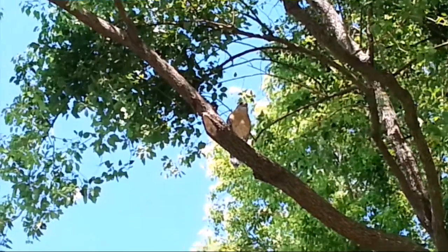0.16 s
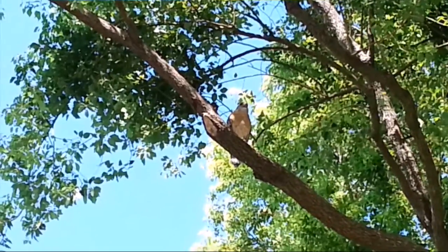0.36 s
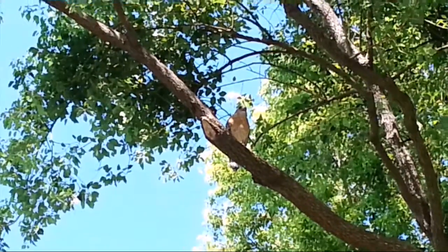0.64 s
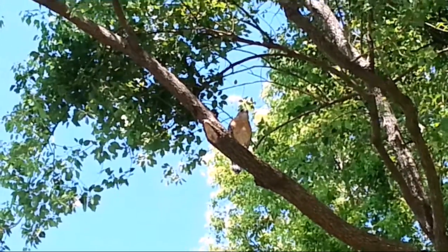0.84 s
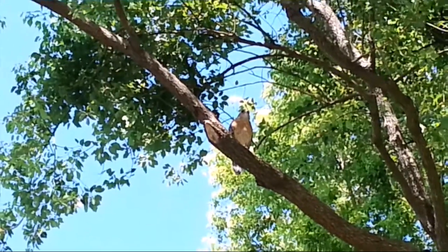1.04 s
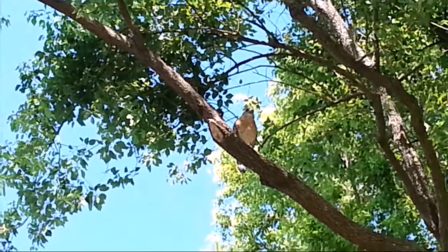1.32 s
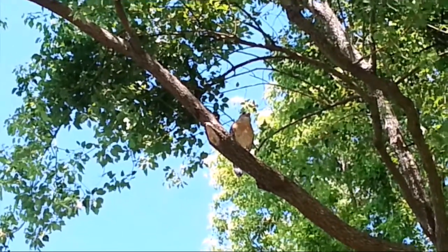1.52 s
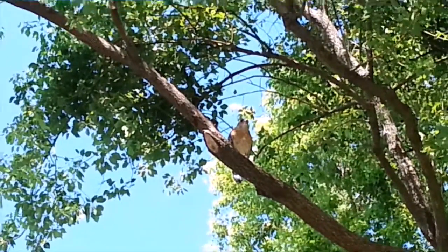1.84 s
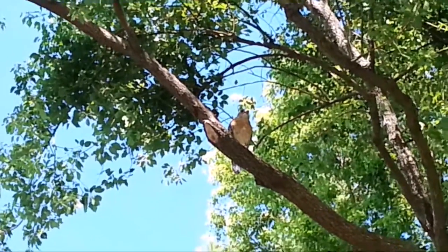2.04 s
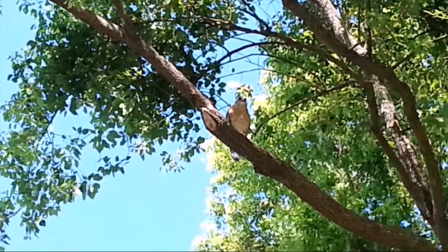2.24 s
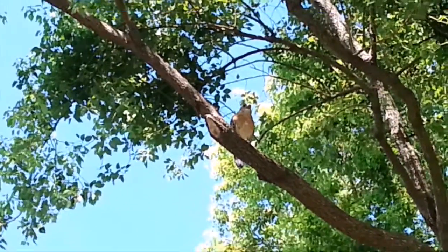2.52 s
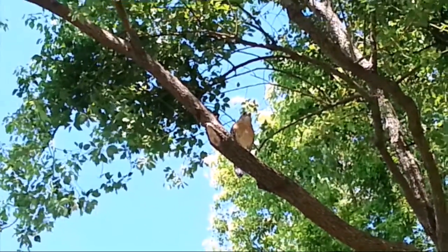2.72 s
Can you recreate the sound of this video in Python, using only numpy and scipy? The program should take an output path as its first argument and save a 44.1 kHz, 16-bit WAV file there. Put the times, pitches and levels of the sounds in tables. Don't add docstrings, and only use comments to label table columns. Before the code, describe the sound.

Three piercing, falling hawk screams echo among trees over gusty low microphone rumble and faint hiss.

```python
import sys
import numpy as np
from scipy import signal
from scipy.fft import rfft, irfft
from scipy.io import wavfile
from scipy.ndimage import uniform_filter1d, minimum_filter1d

SR = 44100
rng = np.random.default_rng(int(sys.argv[2]) if len(sys.argv) > 2 else 0)


def gain_from_db(level_db):
    decades = np.asarray(level_db, float) / 20
    return 10 ** decades


def digitize_waveform(pressure):
    field = np.atleast_2d(pressure).T
    bounded = np.clip(field, -1, 1)
    quanta = np.round(bounded * 32767).astype(np.int16)
    wavfile.write(sys.argv[1], SR, quanta)


N = 127890


def rms_one(x):
    return x / np.sqrt(np.mean(x ** 2, axis=-1, keepdims=True) + 1e-20)


def drift(rate_hz, count=1):
    r = np.exp(-2 * np.pi * rate_hz / SR)
    white = rng.standard_normal((count, N + SR))
    return rms_one(signal.lfilter([1], [1, -2 * r, r * r], white)[:, SR:])


def coloured(spectrum):
    hz, db = np.transpose(spectrum)
    grid_hz = np.arange(N // 2 + 1) * SR / N + 1
    shape_db = np.interp(np.log(grid_hz), np.log(hz), db, left=-80, right=-80)
    return rms_one(irfft(rfft(rng.standard_normal((2, N))) * gain_from_db(shape_db), N))


def resonance(x, hz, width_hz):
    r = np.exp(-np.pi * width_hz / SR)
    return signal.lfilter(np.array([1, 0, -1]) * (1 - r * r) / 2, [1, -2 * r * np.cos(2 * np.pi * hz / SR), r * r], x)


def bells(x, rows):
    for hz, width_hz, db in rows:
        a, w = gain_from_db(db / 2), 2 * np.pi * hz / SR
        s = np.sin(w) * max(width_hz, 45) / hz / 2
        x = signal.lfilter([1 + s * a, -2 * np.cos(w), 1 - s * a], [1 + s / a, -2 * np.cos(w), 1 - s / a], x + 1e-18)
    return x


# pitch_hz, level_db (per Hz)
FLOOR = [(150, -29), (250, -7.5), (2550, -18), (2810, -20), (3690, -25), (4610, -29), (5870, -29.5),
         (8900, -27), (10100, -34), (11000, -82), (22000, -120)]
# pitch_hz, width_hz, lift_db
FLOOR_VALLEY = [(1543, 314, -8), (6950, 870, -9)]
# pitch_hz, width_hz, level_db, throbs_per_s
INSECTS = [(4705, 480, -57.5, 200), (9250, 960, -60.5, 150), (2930, 180, -66.5, 100), (533, 50, -53.5, 15)]


def floor():
    mid, side = bells(coloured(FLOOR), FLOOR_VALLEY)
    alike = 0.25
    both = np.sqrt(1 + alike) * mid + np.sqrt(1 - alike) * side * [[1], [-1]]
    out = gain_from_db(-45 + 1.2 * drift(3)) * both
    for hz, width_hz, db, rate_hz in INSECTS:
        white = rng.standard_normal((2, N))
        mid, side = rms_one(resonance(resonance(white, hz, width_hz), hz, width_hz))
        throb_db = drift(rate_hz) + 0.39 * drift(4.9)
        out = out + gain_from_db(db + throb_db) * (mid + 0.57 * side * [[1], [-1]])
    return out


# pitch_hz, level_db (per Hz)
WIND = [(15, -74), (25, -32), (70, 3.5), (211, 1.5), (287, -4.5), (395, -11), (461, -16), (700, -15),
        (910, -84), (1540, -120)]
# time_s, level_db, left_minus_right_db
GUST = [(0.0, -52, -5.5), (0.3, -46, 4), (0.81, -51.5, -11.5), (1.11, -43, 8.5), (1.54, -46, -3),
        (1.7, -44.5, 15), (1.77, -47, -4), (2.08, -42, 11), (2.329, -41.5, -5.5), (2.431, -42, 23.5),
        (2.45, -45, 0), (2.83, -52.5, 7), (2.9, -45, -6.5)]


def wind():
    s, db, pan_db = np.transpose(GUST)
    t, sides = np.arange(N) / SR, np.array([[.5], [-.5]])
    gust_db = np.interp(t, s, db) + sides * np.interp(t, s, pan_db) + 4.5
    lumps_db = 6 * drift(20, count=2)
    return gain_from_db(gust_db + lumps_db) * coloured(WIND)


# middle_s, peak_db, pitch_hz
LEFT_BUFFETS = [(0.283, -20.5, 161), (0.33, -15, 212), (0.352, -12, 224), (0.44, -11, 280),
                (0.965, -25, 146.4), (0.989, -16, 195), (1.035, -17, 240), (1.052, -20, 160),
                (1.091, -17, 175), (1.138, -14.5, 200), (1.325, -15.5, 221), (1.38, -21.5, 212),
                (1.425, -19.5, 197), (1.595, -22, 214), (1.614, -18.5, 211), (1.646, -19.5, 210),
                (1.672, -19.5, 200), (1.704, -21.5, 193), (1.924, -18, 180), (2.059, -15, 202),
                (2.085, -14, 194), (2.136, -18, 193), (2.216, -18.5, 202), (2.25, -21.5, 210),
                (2.38, -13.5, 179), (2.42, -9.5, 175), (2.626, -22, 157)]
RIGHT_BUFFETS = [(0.304, -25, 139), (0.369, -15, 135), (0.394, -25, 117), (0.416, -25.5, 86),
                 (0.924, -23.5, 161), (0.975, -11, 198), (0.999, -8, 257), (1.026, -17, 185),
                 (1.057, -25, 122), (1.073, -28, 154), (1.097, -31, 173), (1.124, -24, 178),
                 (1.295, -20.5, 169), (1.317, -16, 211), (1.339, -12.5, 262), (1.411, -23, 133),
                 (1.429, -18, 204), (1.553, -24, 118), (1.576, -22, 130), (1.614, -33, 144.2),
                 (1.94, -25.5, 195), (2.092, -26, 141), (2.132, -25, 136), (2.282, -31, 164),
                 (2.34, -33, 189), (2.36, -24.5, 171), (2.897, -21, 124)]


def buffets():
    out, reach = np.zeros((2, N)), SR // 20
    for port, rows in enumerate([LEFT_BUFFETS, RIGHT_BUFFETS]):
        for s, db, hz in rows:
            i = np.arange(int(s * SR) - reach, min(N, int(s * SR) + reach))
            cycles = (i / SR - s) * hz
            swell = np.exp(-(cycles / 0.5) ** 2 / 2)
            out[port, i] += gain_from_db(db) * swell * np.sin(2 * np.pi * (cycles + rng.random()))
    return out


EDGE_S = 0.00093


def note(rows, orders, shimmer, wobble):
    s, hz, db = np.transpose(rows)
    end_s = s[-1] + EDGE_S
    i = np.arange(int(s[0] * SR), int(end_s * SR))
    t = i / SR
    pitch = np.interp(t, s, hz)
    slack = 7 * np.clip((880 - pitch) / 150, 0, 1)
    phase = 2 * np.pi * np.cumsum(pitch * (1 + wobble[i] * (1 + slack))) / SR
    edge = np.clip(np.minimum(t - s[0], end_s - t) / EDGE_S, 0, 1)
    pitches, levels = zip(*orders[::-1])
    out = np.zeros(N)
    for k, order_db in enumerate(np.transpose(levels)):
        partial_db = np.interp(pitch, pitches, order_db) + 0.8 * shimmer[k, i]
        out[i] += gain_from_db(partial_db) * np.sin((k + 1) * phase + k * k)
    out[i] *= np.sqrt(2) * gain_from_db(np.interp(t, s, db)) * edge
    return out


BREAKS_S = [.209, 1.262, 2.207]
# time_s, pitch_hz, effort_db
HIGH = [
    [(0.21, 1303, -46), (0.216, 1326, -30.5), (0.232, 1362, -24), (0.244, 1358, -26), (0.314, 1312, -28.5),
     (0.488, 1220, -29), (0.512, 1147, -33), (0.556, 1111, -37.5), (0.566, 1056, -47.5)],
    [(1.263, 1284, -79), (1.269, 1348, -32), (1.287, 1360, -23), (1.313, 1348, -28), (1.357, 1317, -28),
     (1.535, 1222, -31), (1.553, 1140, -33), (1.589, 1126, -34.5), (1.611, 1093, -40)],
    [(2.208, 1250, -7), (2.212, 1334, -28.5), (2.232, 1351, -25), (2.368, 1273, -28.5), (2.43, 1217, -30),
     (2.45, 1124, -33), (2.476, 1108, -35), (2.486, 1090, -53)],
]
# time_s, pitch_hz, effort_db
LOW = [
    [(0.57, 1016, -30), (0.618, 1019, -31.5), (0.816, 941.4, -29.5), (0.85, 899, -32.5),
     (0.864, 842, -28.5), (0.874, 767, -35.5), (0.886, 600, -32.5), (0.895, 573, -71)],
    [(1.615, 1020, -35.5), (1.629, 1036, -33), (1.651, 1004, -31), (1.659, 1022, -32),
     (1.841, 932.6, -28.5), (1.851, 923, -31), (1.879, 828, -29.5), (1.905, 604, -42)],
    [(2.49, 1040, -29.5), (2.508, 1033, -33.5), (2.69, 954.3, -29), (2.738, 928.3, -27.5),
     (2.748, 893, -35.5), (2.772, 872, -32), (2.79, 818, -30), (2.82, 589, -38.5)],
]
# pitch_hz, list of level_db (one per partial)
LEAD_ORDERS_DB = [(900, [-44, -20, -24, -23, -25, -33, -37, -46])]
HIGH_ORDERS_DB = [(1389, [6, 8, 6, 1.5, -4, -4, -7, -30, -53]),
                  (1285, [6.5, 8.5, 6.5, 4, -7, -5, -20, -20.5, -56]),
                  (1215, [6, 9, 8.5, 8, -6.5, -10, -15, -17.5, -59.5]),
                  (1116, [3.5, 5.5, 6, 3, -4.5, -3.5, 1.5, -10.5, -9])]
LOW_ORDERS_DB = [(1020, [-13, -0.5, -5, -4, -0.5, -14.5, -7, -34, -16.5, -19, -63]),
                 (1004, [-15, 0, -3, -3, -1, -14, -12.5, -27.5, -17, -15.5, -66]),
                 (943, [-13, 1, -5, -8, -3, -28, -18, -21.5, -20, -19.5, -45]),
                 (884, [-16, 0, -3, -10, -13.5, -6, -18, -11.5, -36.5, -13, -22]),
                 (725, [-21, -11.5, -3.5, -7.5, -8.5, -6, -22, -15, -31, -27, -29])]
# pitch_hz, width_hz, lift_db
THROAT = [(2561, 1336, 14.5), (3826, 103, -0.5), (3820, 56, -10), (5515, 730, 8), (5570, 19, 10.5),
          (6325, 140, -7.5), (7885, 61, -11.5), (1237, 530, -4.5)]


def hawk():
    shimmer = drift(30, count=11) * np.arange(1, 12)[:, None] ** 0.41
    wobble, creak = drift(73, count=2)
    rasp = drift(910)[0]
    lead_s, from_hz, to_hz, lead_db, rise_db = 0.024, 730, 1010, -11, 7
    out, crack = np.zeros(N), np.zeros(N)
    for s, high, low in zip(BREAKS_S, HIGH, LOW):
        lead_rows = [(s - lead_s, from_hz, lead_db - rise_db),
                     (s - lead_s / 2, (from_hz + to_hz) / 2, lead_db),
                     (s - EDGE_S, to_hz, lead_db)]
        lead = note(lead_rows, LEAD_ORDERS_DB, 2 * shimmer, 0.004 * creak)
        out += lead * (1 + 0.5 * rasp)

        high_rows = [(s, 1180, high[1][2] - 2), *high[1:]]
        out += note(high_rows, HIGH_ORDERS_DB, shimmer, 0.0033 * wobble)

        last_s, last_hz, last_db = low[-1]
        droop = (last_s + 0.011, last_hz * 0.32, last_db - 15)
        low_rows = [(high[-1][0], *low[0][1:]), *low[1:], droop]
        out += note(low_rows, LOW_ORDERS_DB, shimmer, 0.0033 * wobble)
        crack += 0.3 * np.exp(-abs(np.arange(N) / SR - s) / 0.007)
    return bells(out * (1 + (gain_from_db(-47) + crack) * rasp), THROAT)


# pitch_hz, width_hz, lift_db
LEFT_PORT = [(1059, 13, 5), (1196, 27, -7), (1764, 313, -16.5), (2658, 73, -18), (2970, 120, 1.5),
             (3724, 93, -9.5), (5116, 20, 13.5), (5217, 1040, -15), (7067, 71, 10)]
RIGHT_PORT = [(1004, 14, -2), (1270, 37, -2.5), (2419, 150, -4), (2769, 58.7, -30), (3806, 58, -29),
              (3938, 31, -17.5), (5073, 138, -21), (7400, 590, -11.5), (9620, 1520, -26)]


def wood(x):
    direct = np.array([bells(x, LEFT_PORT), bells(x, RIGHT_PORT)])
    t, decay = np.arange(SR) / SR, 0
    for db, t60_s in [(-19, 0.26), (-22, 0.66)]:
        decay = decay + gain_from_db(db - 60 * t / t60_s) / np.sqrt(t60_s * SR / 14)
    tail = rng.standard_normal((2, SR)) * decay * np.clip(t / 0.012, 0, 1)
    tail = signal.lfilter([.9], [1, -.1], tail)
    return direct + signal.fftconvolve(x[None], tail, axes=1)[:, :N]


# time_s, level_db
TICKS = [
    (2.089, -17),
    (2.619, -24),
]


def tick():
    out = np.zeros(N)
    for s, db in TICKS:
        out[int(s * SR)] = -gain_from_db(db)
    return .3 * out + 5 * resonance(out, 1100, 900)


def scene():
    return floor() + wind() + buffets() + wood(hawk()) + tick()


def roll_off(x):
    return signal.sosfilt(signal.butter(12, 12060, fs=SR, output="sos"), x)


TREBLE_GAPS_S = [.01, .93, 1.115, 2.0, 2.14, 2.885]


def record(dry):
    dry = signal.sosfilt(signal.butter(2, 65, "high", fs=SR, output="sos"), dry)
    dry = 6 * np.tanh(dry / 6)
    dry = signal.sosfilt(signal.butter(4, 10500, fs=SR, output="sos"), dry)

    hz = np.arange(N // 2 + 1) * SR / N
    flipped = dry * (-1.) ** np.arange(N)
    mirror = irfft(rfft(flipped) * (hz > SR / 4), N)
    dry = irfft(rfft(dry) * (hz <= SR / 4), N) + gain_from_db(-12) * mirror * [[1.6], [.25]]

    treble = irfft(rfft(dry) * np.clip(hz / 900 - 5.5, 0, 1), N)
    gap = np.zeros(N)
    for s in TREBLE_GAPS_S:
        gap += np.clip(1.5 - 1.5 * abs(np.arange(N) / SR - s) / 0.026, 0, .85)

    limit = np.minimum(1, .92 / (abs(dry).max(axis=0) + 1e-9))
    limit = uniform_filter1d(minimum_filter1d(limit, size=401), size=401)
    return roll_off(limit * (dry - gap * treble))


dry = scene()
out = record(dry)
digitize_waveform(out)
```